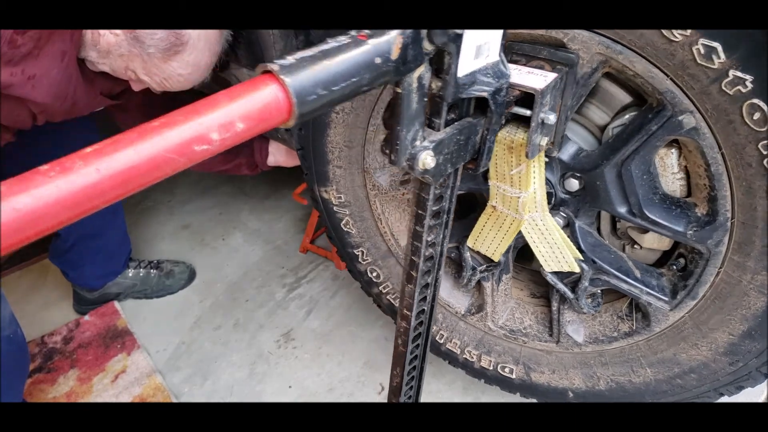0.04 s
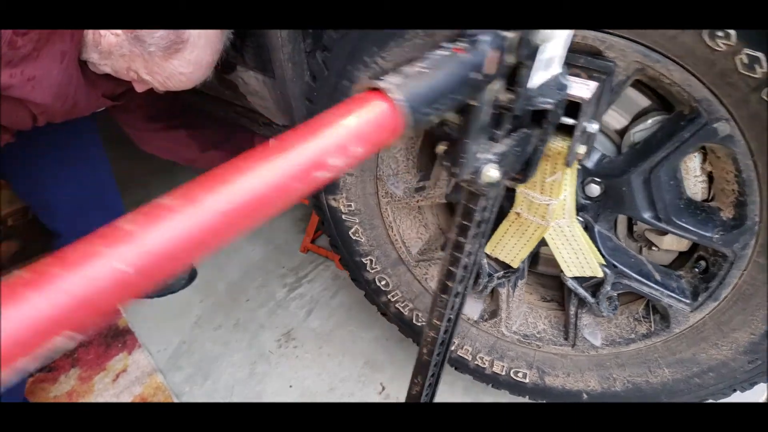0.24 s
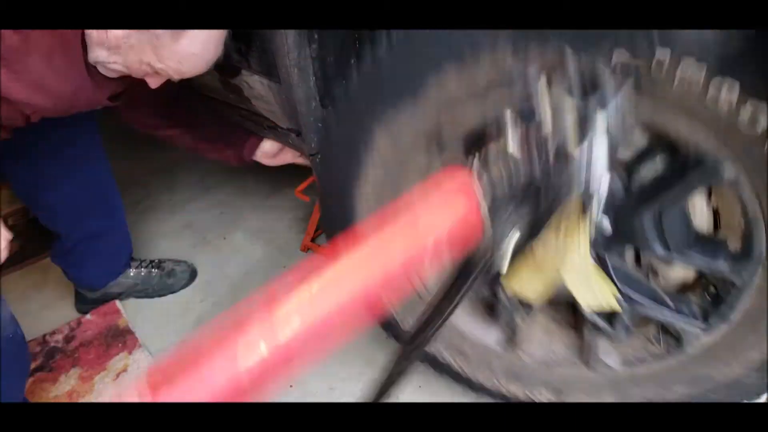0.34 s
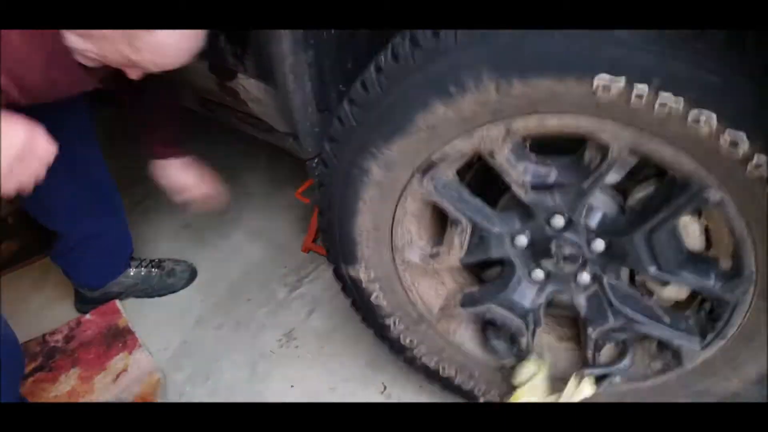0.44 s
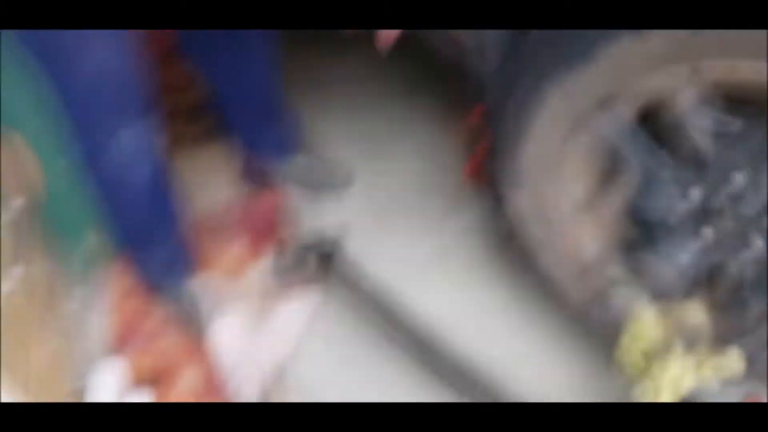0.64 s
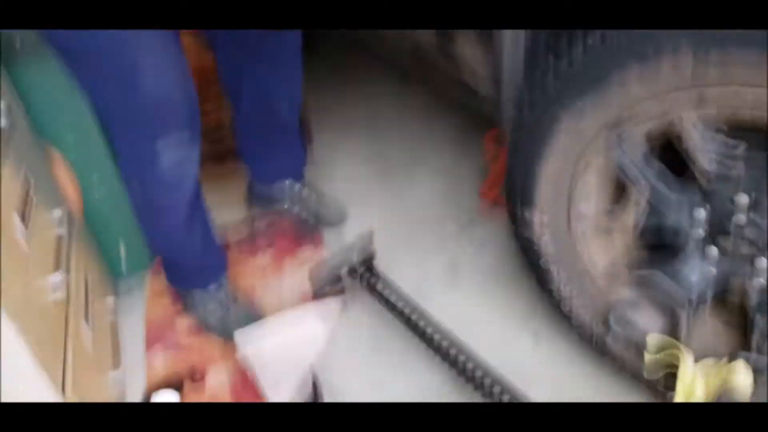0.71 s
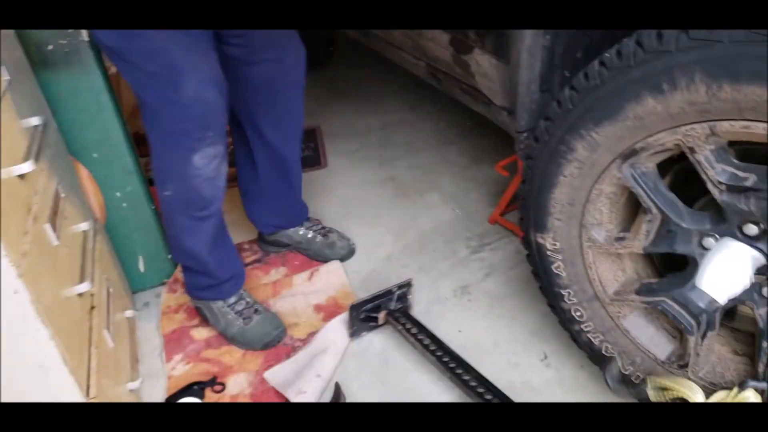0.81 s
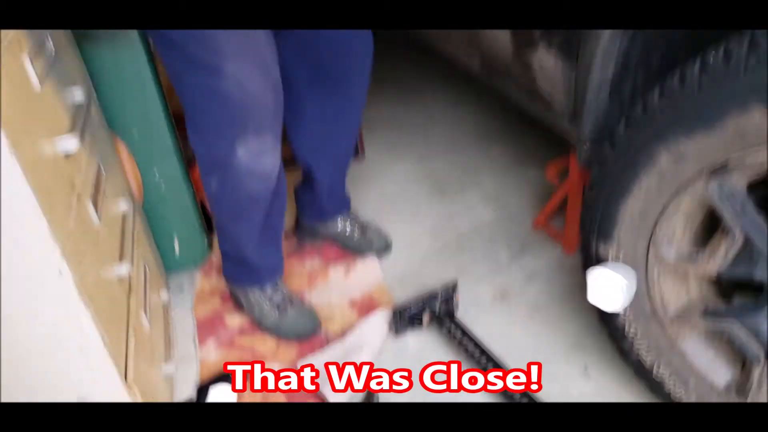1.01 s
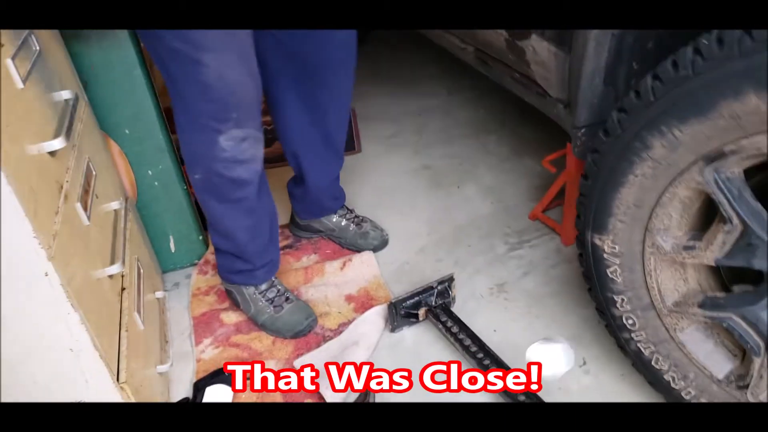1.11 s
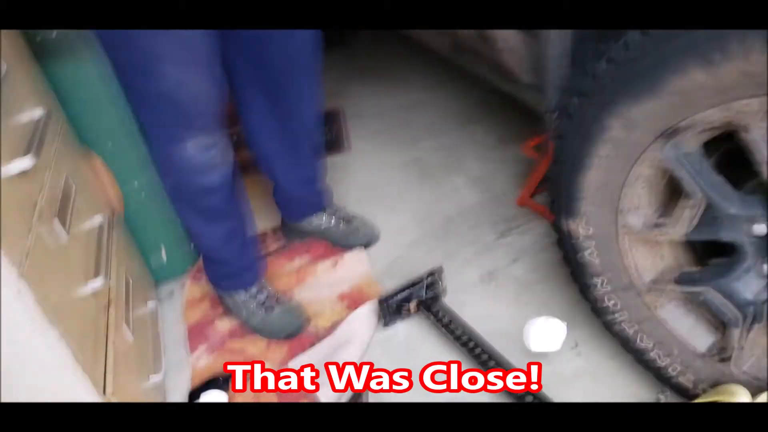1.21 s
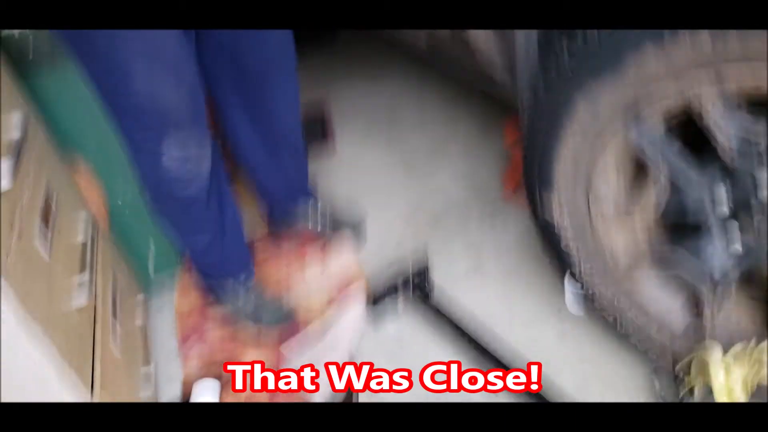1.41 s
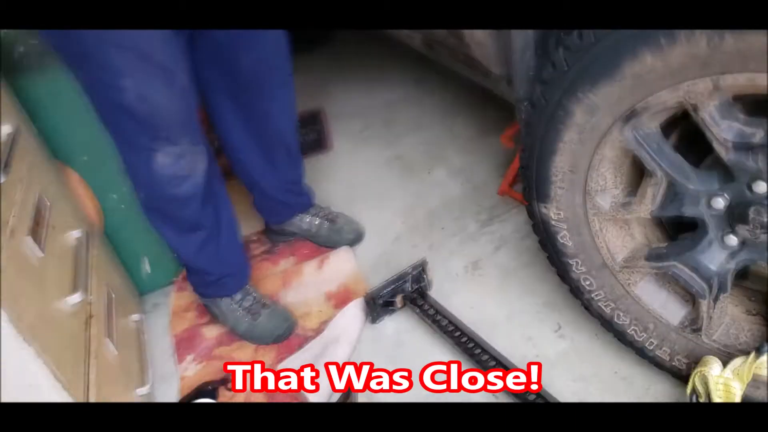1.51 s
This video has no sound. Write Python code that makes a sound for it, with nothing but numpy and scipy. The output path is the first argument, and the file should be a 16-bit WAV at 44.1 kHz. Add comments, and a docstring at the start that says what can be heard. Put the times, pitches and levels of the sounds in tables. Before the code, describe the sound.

Close up in a concrete garage, a vehicle drops with low thumps and its heavy metal jack slams down, rattling and clanging in several bounces, ringing briefly before quiet small taps and a short room tail.

```python
"""Wheel and frame of a vehicle slipping off a farm jack, close by in a concrete garage: sinking low thuds.
The jack clatters (bursts of uneven noise) and scrapes the floor (noise through frame resonances).
Its steel handle tube rings when struck (decaying sines, choked by later blows and touches).
Small knocks follow. A short diffuse tail is the room; the background noise has ducked away by the late knocks."""
import sys
import numpy as np
from scipy import signal
from scipy.fft import rfft, irfft
from scipy.io import wavfile

SR = 44100
rng = np.random.default_rng(int(sys.argv[2]) if len(sys.argv) > 2 else 0)


def digitize_waveform(pressure):
    """Quantize a signal to 16-bit integers and store it at the path in sys.argv[1].

    Rows of a 2-D input are taken as channels; values are limited to [-1, 1].
    """
    field = np.atleast_2d(pressure).T
    bounded = np.clip(field, -1, 1)
    quanta = np.round(bounded * 32767).astype(np.int16)
    wavfile.write(sys.argv[1], SR, quanta)


N = 68355

# Bursts of clatter: start_s, level_db, rise_s, t60_s, tilt_db_per_octave, left_minus_right_db
CLATTER_BURSTS = [(0, -46.5, .002, 0.26, -4, 1), (0.097, -48.5, 0.0025, 0.12, -4.5, 4),
                  (0.201, -28, 0.004, 0.17, -7.5, 2.5), (0.311, -28, 0.0045, 0.15, -11, -15),
                  (0.362, -32.5, .012, 0.023, -5, -12), (.375, -16, 0.001, 0.22, -1.5, 1.6),
                  (.408, -20, 0.0031, 0.48, 1.7, 8), (0.441, -18.5, .02, 0.14, -7.5, -10),
                  (0.496, -23.5, .01, 0.085, 0.5, 2), (.512, -15, .006, 0.091, 1.5, 9),
                  (0.533, -34, .01, 0.8, -1.1, 9), (.569, -16, 0.0015, 0.45, 0.5, 2),
                  (0.591, -24, .004, 0.26, 2.5, 14), (.622, -18, 0.0023, 0.21, 1.5, 4),
                  (.739, -16, 0.0042, 0.39, 2, 2), (.824, -23, 0.0046, 0.23, 1, 3.5),
                  (.867, -26.5, 0.0021, 0.18, 1.5, 0), (.911, -24, 0.0063, 0.25, 1, 2),
                  (1.041, -37, .003, 0.067, -4.5, 5), (1.051, -49, .004, 0.14, -3, -5.5),
                  (1.140, -53.5, .005, .08, -3.5, -9), (1.213, -45.5, .002, 0.14, -3.5, 2),
                  (1.228, -41, 0.0027, 0.042, -6.5, 1), (1.283, -41, .002, 0.053, -8, 1),
                  (1.295, -35.5, 0.0012, 0.027, -9.5, -4), (1.311, -49.5, 0.0012, .04, -7.5, 1),
                  (1.333, -62.5, .002, 0.037, 1.5, 12), (1.445, -57.5, 0.0018, 0.023, -3, -5),
                  (1.450, -39.5, 0.00092, 0.025, -6.5, -2.3), (1.475, -72, 0.0032, 0.054, -1.5, 4),
                  (1.515, -35, 0.0021, 0.072, 4, 4)]
# Clatter spectrum: freq_hz, gain_db
CLATTER_SPECTRUM = [(180, -37), (300, -12.5), (801, -8.5), (915, -3), (1040, -6.5), (1720, -3.5),
                    (7080, -9), (8790, -14), (15000, -5), (16000, -20.5)]
# Background spectrum: freq_hz, gain_db
BACKGROUND_SPECTRUM = [(18, -38), (30, -0.5), (374, -13.5), (684, -22.5), (937, -26.5), (1190, -33.5),
                       (1280, -22), (1390, -28.5), (2290, -27.5), (16000, -40)]
# Background level: time_s, level_db
BACKGROUND_LEVEL = [(0, -36), (.06, -48.5), (.36, -43.5), (.9, -54.5), (1.201, -69), (1.329, -74),
                    (1.4, -89), (1.55, -77)]
# Tyre, frame and small things on concrete: start_s, level_db, settled_pitch_hz, sink_s, t60_s, rumble_db
THUD_EVENTS = [(.004, -33, 293, 0.0018, .08, -8.5), (0.101, -36, 388, 0.00065, 0.1, -8),
               (.203, -21.5, 222.5, 0.0015, 0.19, 0), (0.2241, -12.5, 105, .001, 0.13, -17.5),
               (0.257, -26.5, 110, 0.0023, 0.24, -14), (.285, -26.5, 78.4, 0.0014, 0.098, -7),
               (0.312, -34.5, 150, 0.0041, 0.26, -2.5), (0.376, -21.5, 80, 0.0021, 0.14, -7),
               (0.3923, -0.5, 169, .0006, 0.16, -11), (.437, -14.5, 70, 0.0012, 0.26, -10),
               (0.489, -25, 58.4, 0.0026, 0.27, -26), (0.542, -32.5, 60.5, 0.0035, 0.26, -3.5),
               (0.573, -17.5, 89, 0.0035, .1, -6), (.622, -13, 73, 0.0024, .08, -15.5),
               (0.701, -41, 84, 0.0019, .12, -0.5), (0.727, -39.5, 62, 0.0032, 0.18, 2),
               (.912, -39, 264, 0.0014, 0.13, -4.5), (1.041, -48.5, 127, 0.0037, 0.36, -5),
               (1.225, -40.5, 380, 0.0013, 0.039, -14), (1.232, -41.5, 129, 0.0037, 0.19, -9),
               (1.265, -50, 303, 0.0013, .05, -7), (1.283, -45.5, 99.5, 0.0045, 0.27, -8),
               (1.311, -49, 146.4, 0.0023, 0.037, -13), (1.449, -36.5, 366, 0.0011, 0.037, -3.5),
               (1.458, -45, 121.8, 0.0042, 0.13, -7)]
# Scrapes of the jack's frame: start_s, level_db, rise_s, t60_s
SCRAPE_EVENTS = [(0.206, -36, 0.0015, 0.12), (.376, -31.5, 0.0071, .08), (0.403, -20.5, 0.037, 0.13),
                 (.432, -17, 0.017, 0.12), (.455, -19, 0.0071, 0.088), (.57, -28, 0.0019, 0.23)]
# Resonances of the jack's steel frame: freq_hz, width_hz, gain_db
FRAME_MODES = [(404, 170, -1.5), (675, 100, 1.5), (1160, 120, 6), (1450, 95, -0.5), (1762, 92, -5.5),
               (2090, 130, -11.5), (2830, 200, -7)]
# Handle tube modes, some low ones in close pairs: freq_hz, level_db, t60_s, left_minus_right_db
TUBE_MODES = [(936, 0, .9, -3), (1764, -7, .6, -3), (1784, 0, .7, -3), (2824, -6, .5, 0), (2838, 0, .5, 0),
              (4037, -.6, .55, 3), (4079, -1.6, .3, 3), (5420, -11, .25, 3), (5965, -9, .4, 3),
              (6094, -7, .45, 3), (6194, -2, .5, 3), (6360, 0, .45, 3), (6570, -10, .3, 3),
              (6850, -13, .15, 4), (7700, -9, .35, 5), (8230, -10, .3, 5), (8870, -8, .35, 7),
              (9560, -6, .35, 7), (9920, -10, .25, 7), (10374, -15, .3, 7), (11140, -6, .35, 7),
              (11520, -8, .35, 7), (12120, -8, .3, 7), (12950, -8, .35, 6), (13870, -11, .35, 6),
              (14760, -10, .35, 6)]
# Blows and damping touches on the tube; family levels depend on where it is struck:
# start_s, rise_s, earlier_ring_change_db,
# level_0k9_db, level_1k8_db, level_2k8_db, level_4k_db, level_higher_db
TUBE_CONTACTS = [(.445, 0.011, 11.5, -36, -28.5, -24.5, -37, -41),
                 (.49, 0.0079, -14, -32, -43.5, -40, -36, -37), (.526, 0.005, -4, -55, -50, -22, -18, -20),
                 (0.57, 0.0011, -35, -31.5, -33, -40.5, -34, -40),
                 (.739, 0.0023, -2, -28, -26, -21, -36, -30), (.771, 0.006, -11, -36, -27, -35, -43.5, -29),
                 (.825, 0.0036, -7, -65, -52, -31, -47, -46),
                 (0.912, 0.0012, -15, -45, -38.5, -39.5, -45, -48),
                 (.985, 0.036, -6, -58, -39, -57, -58, -76),
                 (1.042, .004, -10.5, -45, -54, -46.5, -44, -48),
                 (1.126, 0.015, -12, -59.5, -51.5, -72.5, -59.5, -63.5),
                 (1.215, .002, -18, -74, -67.5, -60.5, -65, -79), (1.34, .002, -8, -99, -85, -85, -90, -99),
                 (1.443, .002, -22.5, -99, -99, -99, -99, -99)]
# Borders between the tube's mode families: edge_hz
MODE_FAMILY_EDGES_HZ = [1300, 2300, 3400, 5000]

STEREO_HZ = 900  # scales how left and right grow unlike with frequency
PAN_FULL_HZ = 5900  # table pan of noise applies here: less below, up to 1.5 times above
GRAIN_DB, GRAIN_PER_S = 2.5, 700
RATTLE_DB, RATTLE_WIDTH_HZ, RATTLE_FROM_HZ = 0, 47, 5000
GLIDE = 2.35  # extra starting pitch, as a multiple of settled pitch
PUNCH, PUNCH_S = 2.08, 0.0043  # extra strength of the first swing
BODY_HZ = 260  # width of the thud's rumble above its pitch
ROOM_T60_S, ROOM_DB, ROOM_HZ = .25, -15, 3000
WAVER_DB, WAVER_PER_S = 3.5, 30.58
TOP_HZ = 15900


def undb(db):
    """Decibels to gain."""
    return 10 ** (np.asarray(db) / 20)


def pan(db):
    """Left and right gains for a level difference."""
    return undb(np.array([db, -db]) / 2)


def noise(n, spectrum, tilt_db=0., pan_db=0.):
    """Stereo noise of rms 1 with a spectrum, more alike in the bass; pan grows with frequency."""
    f_hz = np.maximum(np.fft.rfftfreq(n, 1 / SR), 20)
    table_hz, table_db = np.array(spectrum, float).T
    gain_db = np.interp(np.log(f_hz), np.log(table_hz), table_db) + tilt_db * np.log2(f_hz / 4000)
    mid, side = rfft(rng.standard_normal((2, n))) * undb(gain_db)
    side = side * np.minimum(f_hz / STEREO_HZ + 0.34, 1)
    # the phone's body shades treble more than bass
    shading = pan(pan_db * np.minimum(f_hz / PAN_FULL_HZ, 1.5))
    x = irfft(np.array([mid + side, mid - side]) * shading, n)
    return x / np.sqrt(np.mean(x ** 2))


def shape(t, rise_s, t60_s):
    """Rise, then die away exponentially."""
    rise = np.sin(np.pi / 2 * np.clip(t / max(rise_s, 1e-4), 0, 1)) ** 2
    return rise * undb(-60 * np.maximum(t - rise_s, 0) / t60_s)


def add(out, start_s, x):
    """Mix x into out from a time on."""
    i = max(int(start_s * SR), 0)
    out[:, i:i + x.shape[1]] += x[:, :N - i]


def grain(t):
    """Uneven strength of many tiny contacts."""
    strength = np.minimum(rng.exponential(size=2000), 3)
    return undb(GRAIN_DB * np.interp(t, np.arange(2000) / GRAIN_PER_S, strength))


def clatter():
    """Loose steel parts and grit: bursts of dense, uneven little contacts."""
    out, t = np.zeros((2, N)), np.arange(SR // 2) / SR
    for start_s, level_db, rise_s, t60_s, tilt_db, pan_db in CLATTER_BURSTS:
        contacts = noise(len(t), CLATTER_SPECTRUM, tilt_db, pan_db) * grain(t)
        add(out, start_s, undb(level_db) * contacts * shape(t, rise_s, t60_s))
    return out


def rattle(x):
    """The clatter plus the tube's upper modes that it drives, damped by contact."""
    f_hz = np.fft.rfftfreq(N, 1 / SR)
    ring = sum(undb(level_db) / (1 + 2j * (f_hz - hz) / RATTLE_WIDTH_HZ)
               for hz, level_db, _, _ in TUBE_MODES if hz > RATTLE_FROM_HZ)
    return irfft(rfft(x) * (1 + undb(RATTLE_DB) * ring), N)


def background():
    """Steady coloured noise under a changing level."""
    time_s, level_db = np.array(BACKGROUND_LEVEL).T
    return noise(N, BACKGROUND_SPECTRUM) * undb(np.interp(np.arange(N) / SR, time_s, level_db))


def thuds():
    """Dull impacts: a low swing starts high and strong and sinks to its pitch, with some rumble."""
    out, t = np.zeros((2, N)), np.arange(SR // 3) / SR
    punch = (1 + PUNCH * np.exp(-(t / PUNCH_S) ** 2)) / 2
    for start_s, level_db, hz, sink_s, t60_s, rumble_db in THUD_EVENTS:
        turns = hz * (t + GLIDE * sink_s * (1 - np.exp(-t / sink_s)))
        swing = -np.sin(2 * np.pi * turns) * shape(t, .0025, t60_s) * punch
        top_hz = hz + BODY_HZ
        rumble = noise(len(t), [(30, -12), (hz, 0), (top_hz, -6), (4 * top_hz, -40), (20000, -80)])
        rumble = undb(rumble_db) * rumble * shape(t, 0.0067, t60_s)
        add(out, start_s, undb(level_db) * (swing + rumble))
    return out


def room(x):
    """Short diffuse tail of the garage: decaying noise convolved with the mono mix."""
    t = np.arange(SR // 2) / SR
    tail = noise(len(t), [(30, 0), (ROOM_HZ, -3), (20000, -12)]) * shape(t - .004, 0.0037, ROOM_T60_S)
    tail = tail / np.sqrt(np.sum(tail ** 2) / 2)
    return undb(ROOM_DB) * signal.fftconvolve(x.mean(0, keepdims=True), tail, axes=1)[:, :N]


def scrapes():
    """Rough contact with the floor rings the frame's resonances."""
    out, t = np.zeros((2, N)), np.arange(SR // 4) / SR
    for start_s, level_db, rise_s, t60_s in SCRAPE_EVENTS:
        push = noise(len(t), [(30, 0), (20000, 0)]) * grain(t) ** 2 * shape(t, rise_s, t60_s)
        rung = np.zeros_like(push)
        for hz, width_hz, gain_db in FRAME_MODES:
            b, a = signal.iirpeak(hz, hz / width_hz, SR)
            rung += undb(gain_db) * np.sqrt(SR / width_hz) * signal.lfilter(b, a, push)
        add(out, start_s, undb(level_db) * rung / len(FRAME_MODES))
    return out


def tube():
    """Blows set the tube's modes off anew; later blows and touches choke the earlier, wavering ringing."""
    out, t = np.zeros((2, N)), np.arange(N) / SR
    hz, mode_db, t60_s, pan_db = np.array(TUBE_MODES, float).T[:, :, None]
    # the two modes of a pair start opposed, so the beat swells first
    turn = np.pi * np.arange(len(hz))[:, None]
    family = np.searchsorted(MODE_FAMILY_EDGES_HZ, hz)
    lag = rng.uniform(-0.91, 1, hz.shape) * np.minimum(hz / STEREO_HZ / 2, 1.2)  # radians, opposite per side
    # the rocking tube's ring wavers
    waver_s = np.arange(200) / WAVER_PER_S
    drift = rng.standard_normal((len(hz), 200))
    waver_db = WAVER_DB * np.array([np.interp(t, waver_s, row) for row in drift])
    side_gains = pan(pan_db)
    for k, (start_s, rise_s, _, *family_db) in enumerate(TUBE_CONTACTS):
        i = int(start_s * SR)
        u = t[:min(N - i, SR // 3)]
        choke_db = sum(later[2] * np.clip((u + start_s - later[0]) / .004, 0, 1)
                       for later in TUBE_CONTACTS[k + 1:])
        level_db = np.array(family_db)[family] + mode_db + choke_db + waver_db[:, i:i + len(u)]
        size = undb(level_db) * shape(u, rise_s, t60_s)
        phase = 2 * np.pi * hz * u + turn
        left = (size * side_gains[0] * np.sin(phase + lag)).sum(0)
        right = (size * side_gains[1] * np.sin(phase - lag)).sum(0)
        add(out, start_s, np.array([left, right]))
    return out


def scene():
    """All sources, their room tail and the background."""
    dry = thuds() + rattle(clatter()) + scrapes() + tube()
    return background() + dry + room(dry)


def record(dry):
    """The phone drops the deepest bass, rounds the highest peaks and cuts the top."""
    x = signal.sosfilt(signal.butter(4, 45, "high", fs=SR, output="sos"), dry)
    rounded = x / (1 + x ** 4) ** (1 / 4)
    return signal.sosfilt(signal.ellip(10, .2, 80, TOP_HZ, fs=SR, output="sos"), rounded)


dry = scene()
out = record(dry)
digitize_waveform(out)
```